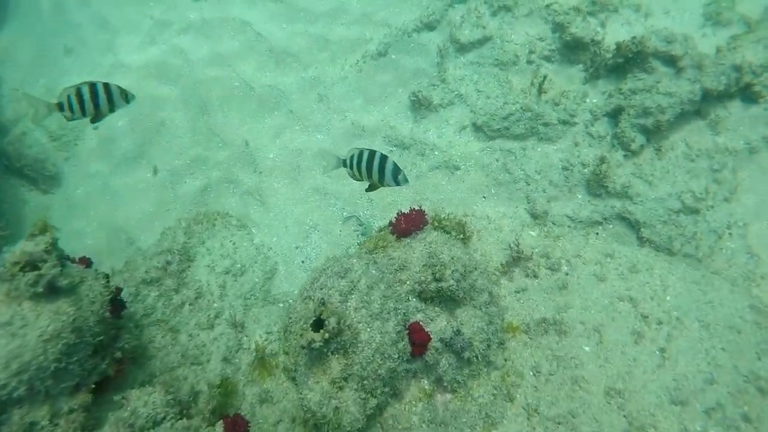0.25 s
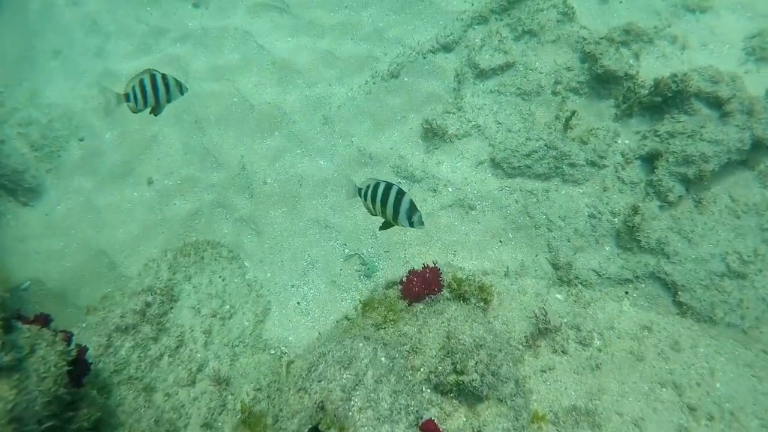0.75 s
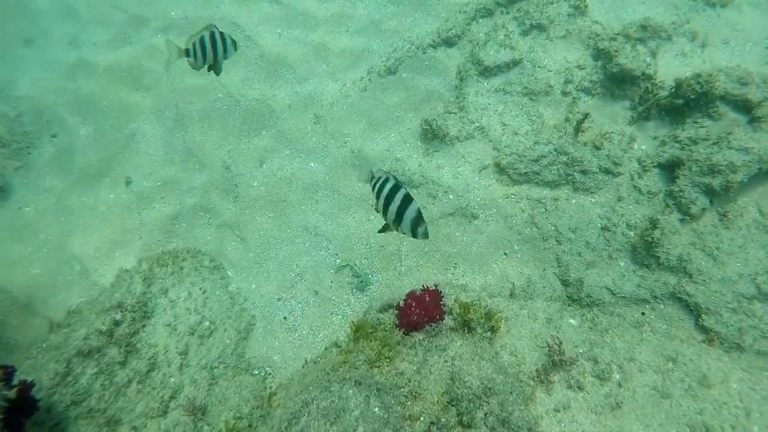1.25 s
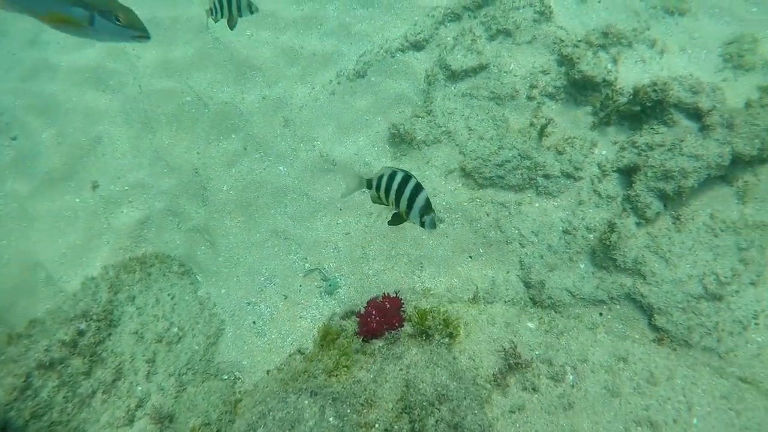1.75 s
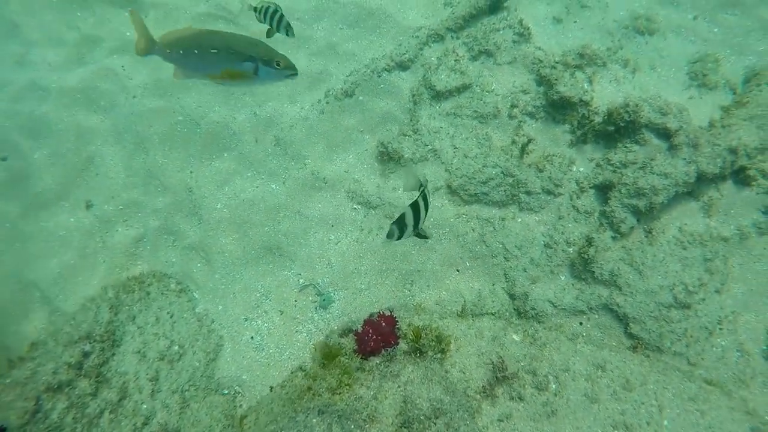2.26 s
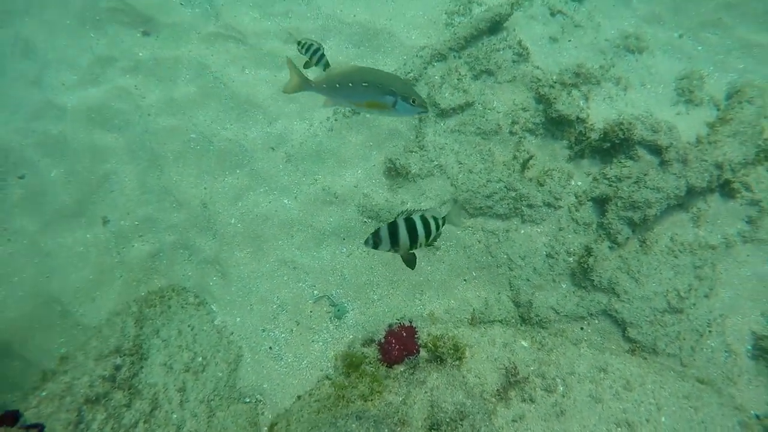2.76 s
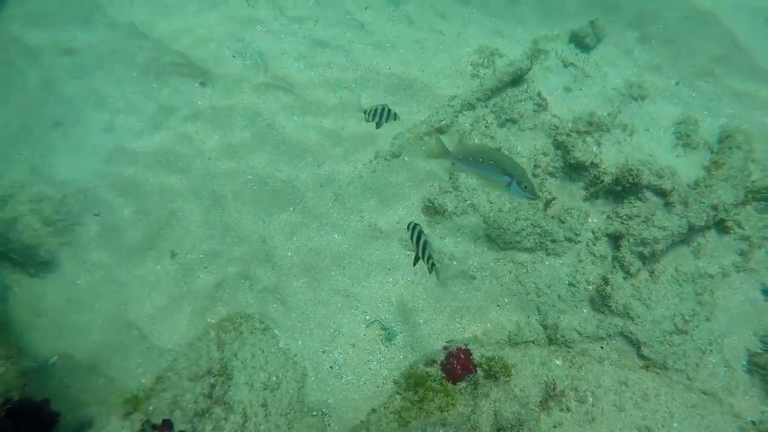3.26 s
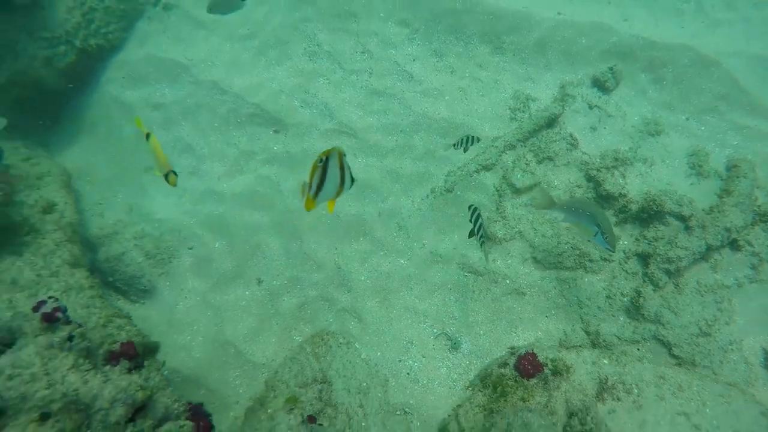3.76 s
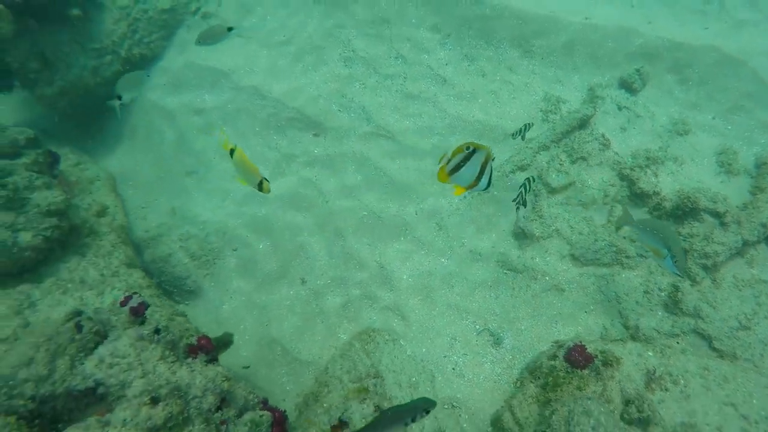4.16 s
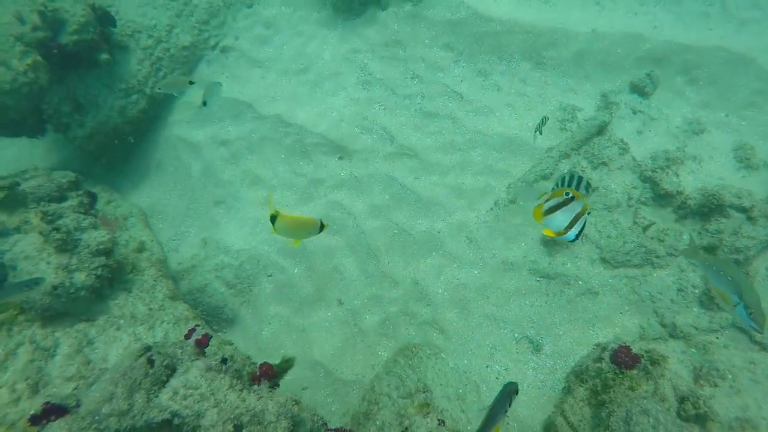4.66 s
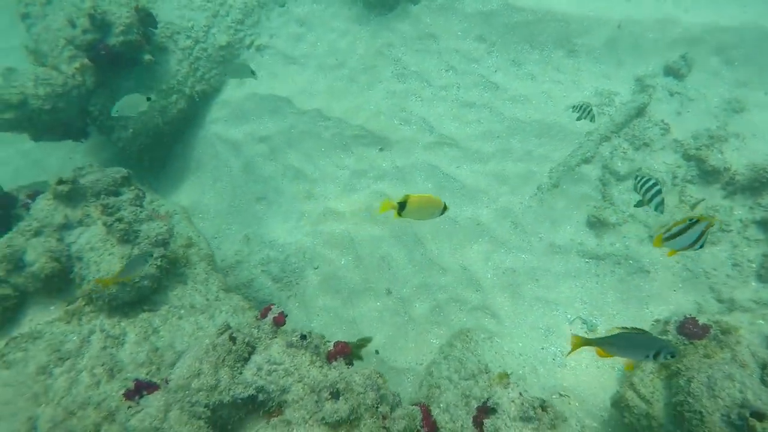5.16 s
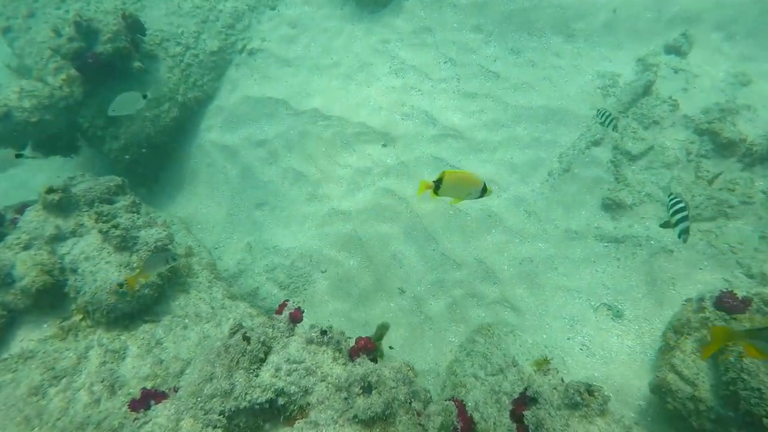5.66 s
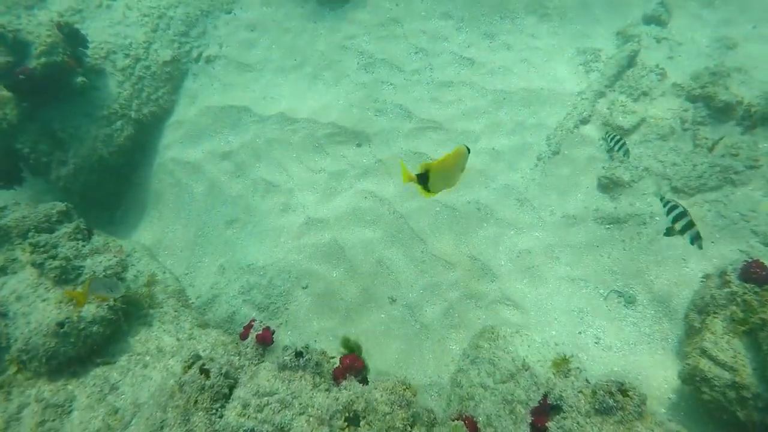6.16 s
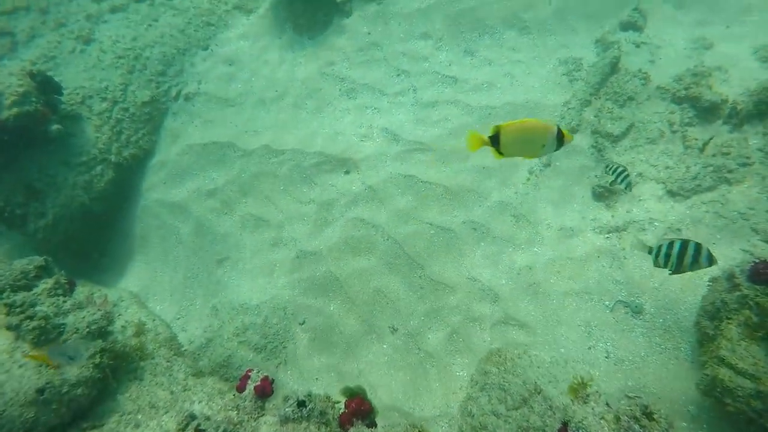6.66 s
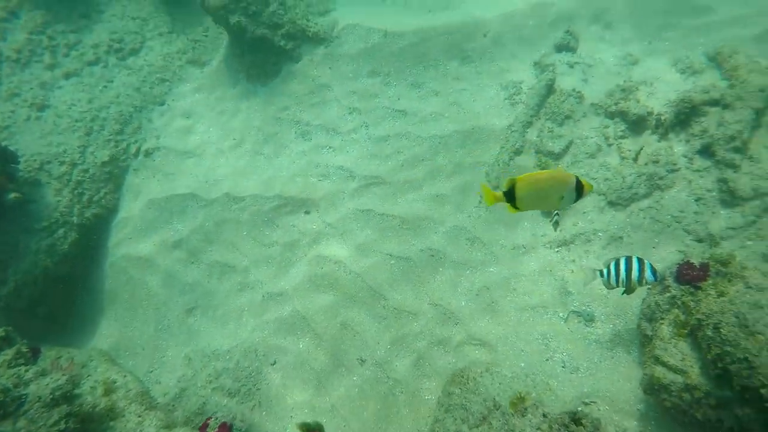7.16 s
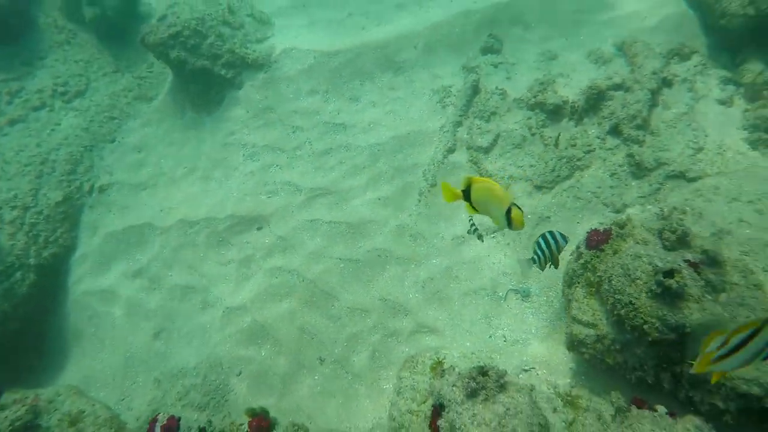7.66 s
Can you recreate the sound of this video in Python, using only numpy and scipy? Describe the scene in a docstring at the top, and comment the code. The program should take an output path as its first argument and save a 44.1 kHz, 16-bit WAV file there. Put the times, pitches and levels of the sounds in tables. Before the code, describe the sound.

A deep underwater rumble swells and eases as water pushes against a submerged camera's housing. Over it runs a constant, irregular crackle of snapping shrimp on the surrounding reef: close cracks and hollow taps, softer clicks further off, and a fine distant sizzle above a low wash. Occasional small bubble blips and soft thumps mix in, and the texture stays much the same throughout.

```python
"""Snapping shrimp crackle all around on a shallow reef, heard from inside a waterproof camera housing.
Each snap is a collapsing bubble: a sharp crack scattered by rock and sand, and a low knock that rings
the housing. Far off, the shrimp merge into a fine sizzle over a low wash. A few bubbles blip, some
snaps carry a deep thump, and water moving past the housing makes a deep, uneven rumble."""
import sys
import numpy as np
from scipy import signal
from scipy.fft import rfft, irfft, next_fast_len
from scipy.io import wavfile
from scipy.ndimage import uniform_filter1d

SR = 44100
rng = np.random.default_rng(int(sys.argv[2]) if len(sys.argv) > 2 else 0)


def store_pcm(level_fs):
    """Save levels as 16-bit WAV."""
    pcm = np.round(np.clip(level_fs, -1, 1) * 32767).astype(np.int16)
    wavfile.write(sys.argv[1], SR, np.atleast_2d(pcm).T)


N = 349272

# push of the water on the housing: t/s, level/dB
WATER_PUSH = [(0.0, -29), (0.12, -28.5), (0.84, -34.7), (1.04, -28.5), (1.32, -36.3), (1.52, -33),
              (2.2, -33.0), (2.56, -28.6), (3.56, -33.5), (4.12, -25), (4.8, -35.5), (4.92, -28.5),
              (6.52, -34), (6.68, -24.5), (7.0, -33.5), (7.16, -26), (7.48, -33.4), (7.91, -30.5)]
# colour of the rumble at the microphone: f/Hz, gain/dB
RUMBLE_COLOUR = [(12, -32.5), (22, -13), (30, 5), (37, -0.5), (45, -0.5), (52, -7.5), (62, -16.5),
                 (76, -29.5), (110, -46.5), (220, -36.5), (500, -104)]
# colour of the wash from the far reef: f/Hz, gain/dB
WASH_COLOUR = [(60, -16.5), (110, 5), (200, -3), (450, -9), (670, -4.5), (850, -11.5), (1200, -27.5),
               (2500, -19.5), (6000, -32), (15000, -38.5)]
# broad response of the housing wall: f/Hz, gain/dB
WALL_RESPONSE = [(90, 6), (180, -4), (450, -13.5), (720, 10), (1250, 0.1), (1700, -8), (2100, 4), (2900, 7),
                 (4100, 1), (5100, -12.5), (5800, -8), (9000, -15.5), (10500, -18), (13000, -16),
                 (15000, -28)]
# resonances of the wall: f/Hz, width/Hz, lift/dB
WALL_RESONANCES = [(1527, 54, 14), (1896, 69, 22), (2367, 220, 11), (3200, 128, 9.5), (3543, 116, 8.5),
                   (6990, 120, 7), (8750, 1160, 7.5)]
# short pitched blips, from bubbles and the thumps under some snaps: t/s, f/Hz, level/dB
BLIPS = [(0.039, 222, -34.5), (0.322, 188, -36), (0.424, 358, -45), (0.597, 263, -41), (.632, 239, -39.5),
         (0.835, 144, -44), (.879, 153, -34.5), (1.124, 900, -49), (1.139, 453, -40.5), (1.328, 175, -30),
         (3.01, 170, -36), (3.085, 620, -38), (3.383, 1960, -47), (7.763, 174, -30)]
# rise and fall of the surrounding colony: t/s, gain/dB
COLONY_SWELL = [(0, 4.5), (.3, -1.5), (.5, -1), (.8, -6.5), (1.1, 1), (1.3, 0.5), (2, 1), (2.35, -4),
                (2.6, 3.5), (3.4, -2), (3.9, -0.5), (4.55, -2), (4.85, -1.5), (5.2, 4.5), (5.55, -4.5),
                (6.15, 0), (6.5, -0.5), (7.92, 1)]
# snaps nearest the microphone: t/s, knock f/Hz, knock level/dB, crack level/dB, bright tick level/dB
NEAR_SNAPS = [(.0397, 500, -36.5, -49, -55), (.1209, 288, -68, -46.5, -63), (.2262, 410, -32.5, -40.5, -50),
              (.2539, 440, -56, -40, -66), (.2651, 450, -46, -45, -67), (.3218, 347, -27.5, -38.5, -57),
              (.3497, 420, -62, -39, -67), (.3805, 566, -38.5, -47, -55), (.5294, 606, -40, -54, -76),
              (.6579, 560, -38, -40, -62), (.6894, 655, -40.5, -38, -59.5), (.7435, 370, -48, -44.5, -56.5),
              (.8579, 350, -73, -47.5, -56), (.8819, 250, -49, -43.5, -58), (1.0571, 684, -33, -40.5, -56),
              (1.0894, 317, -35.5, -42.5, -49.5), (1.1714, 366, -41, -62, -81),
              (1.1845, 208, -52, -43.5, -52), (1.2612, 650, -32.5, -69, -80),
              (1.4322, 540, -67, -43.5, -62), (1.5114, 496, -41, -51.5, -74), (1.5371, 278, -31, -49, -57),
              (1.7766, 360, -31.5, -45, -48.5), (1.8067, 400, -32, -42.5, -45.5),
              (1.909, 333, -41, -48, -57), (1.9281, 645, -32.5, -55, -74), (1.9915, 424, -35.5, -36, -82),
              (2.0745, 550, -34.5, -45, -50), (2.1164, 580, -71, -43, -56), (2.1528, 593, -24.5, -35, -50),
              (2.2653, 250, -70, -48.5, -48), (2.473, 600, -31.5, -49, -73), (2.5409, 434, -34, -42.5, -57),
              (2.6909, 357, -63, -43, -64), (2.7556, 348, -31.5, -45, -54), (2.7965, 605, -31.5, -58, -63),
              (2.8593, 560, -63, -44, -56), (2.8929, 610, -46, -45, -72), (3.001, 330, -37, -35.5, -55),
              (3.2605, 570, -39.5, -49, -54.5), (3.3218, 565, -21, -35.5, -66),
              (3.5227, 450, -60, -45, -54), (3.55, 594, -35.5, -42, -59), (3.6127, 322, -35.5, -41.5, -64),
              (3.7382, 330, -34.5, -59, -52), (3.7762, 620, -32.5, -43, -72),
              (3.8103, 332, -31, -43.5, -42.5), (3.8312, 397, -42, -51, -65), (3.9197, 358, -34, -43, -60),
              (3.9567, 414, -54, -36, -64), (3.9645, 424, -35, -53.5, -69), (3.9901, 427, -40, -46.5, -60),
              (4.0629, 414, -36, -38.5, -49), (4.1, 580, -21, -39, -55), (4.152, 630, -39.5, -50, -61),
              (4.2413, 620, -42.5, -46.5, -63), (4.3067, 500, -50, -44, -63),
              (4.4442, 400, -26.5, -33.5, -48.5), (4.6295, 480, -35, -45.5, -52.5),
              (4.8443, 490, -74, -46, -53.5), (4.9073, 617, -23.5, -37, -56),
              (4.9603, 530, -65, -39.5, -60), (5.0003, 365, -33, -43.5, -55),
              (5.0141, 413, -30.5, -42, -76), (5.0932, 480, -29, -36, -53), (5.1133, 266, -40, -57, -51),
              (5.1279, 530, -32.5, -44, -50), (5.1785, 370, -41, -42.5, -69),
              (5.2135, 293, -34.5, -49.5, -51.5), (5.2329, 550, -35.5, -45.5, -79),
              (5.2514, 613, -29.5, -36.5, -55), (5.2853, 414, -38, -40, -61),
              (5.3142, 540, -35.5, -40, -62), (5.4466, 460, -36, -38, -66),
              (5.4584, 327, -28, -46.5, -41.5), (5.562, 560, -33.5, -43.5, -56.5),
              (5.6619, 590, -22, -36.5, -50), (5.7548, 560, -49, -39, -73), (5.7755, 480, -65, -43.5, -52),
              (6.0661, 585, -33.5, -44.5, -57), (6.0964, 600, -25, -34.5, -57),
              (6.1656, 510, -37, -41, -73), (6.1759, 394, -31.5, -41.5, -55), (6.346, 580, -22, -37.5, -49),
              (6.4028, 550, -69, -42, -59.5), (6.6138, 637, -35, -69, -79), (6.6668, 460, -39, -49, -56),
              (6.6891, 310, -63, -46, -55), (6.7066, 390, -37.5, -42, -52), (6.8369, 315, -40, -50, -78),
              (6.9613, 500, -33.5, -41, -50.5), (7.0517, 280, -31.5, -46.5, -48.5),
              (7.0712, 370, -52, -46, -49.5), (7.1314, 470, -30, -37.5, -53), (7.2214, 744, -35, -43, -53),
              (7.2686, 326, -28.5, -46, -46.5), (7.4167, 460, -39, -50, -53.5),
              (7.5033, 584, -29, -34, -55), (7.5349, 347, -38.5, -46, -60), (7.6382, 288, -35, -40.5, -61),
              (7.6905, 450, -31, -41, -54), (7.7662, 310, -34, -43.5, -77),
              (7.8108, 420, -42, -39.5, -58.5)]

SNAP_SAMPLES, SNAP_S = 2048, .013  # room for one short sound; time over which its level is taken
BODY_HZ, BODY_WIDTH_HZ, BODY_DB = 687.6, 140, 10.5  # main ring of the housing


def undb(db):
    """Decibels to gain."""
    return 10 ** (np.asarray(db) / 20)


def level(x, db):
    """Set the rms level."""
    return x * undb(db) / np.sqrt(np.mean(x ** 2))


def burst_level(x, db):
    """Set each row's energy as an rms level over SNAP_S."""
    return x * undb(db) / np.sqrt(np.sum(x ** 2, axis=-1, keepdims=True) / (SNAP_S * SR))


def colour(x, points):
    """Causal filter through points of f/Hz, gain/dB, built from the cepstrum."""
    size = x.shape[-1]
    hz, db = np.transpose(points)
    f = np.maximum(np.fft.rfftfreq(size, 1 / SR), 1)
    gain = undb(np.interp(np.log(f), np.log(hz), db))
    cepstrum = irfft(np.log(gain), size)
    cepstrum[1:size // 2] *= 2
    cepstrum[size // 2 + 1:] = 0
    return irfft(rfft(x) * np.exp(rfft(cepstrum)), size)


def pass_band(x, kind, hz, order):
    """Keep the "low" or "high" side of hz."""
    return signal.sosfilt(signal.butter(order, hz, kind, fs=SR, output="sos"), x)


def ring(x, hz, width_hz, db):
    """A resonance that lifts its own band by db and rings on."""
    b, a = signal.iirpeak(hz, hz / width_hz, fs=SR)
    return x + (undb(db) - 1) * signal.lfilter(b, a, x)


def noise(points):
    """Steady noise of a given colour."""
    return colour(rng.standard_normal(next_fast_len(N, True)), points)[:N]


def wavelets(hz, swell_s):
    """Short tones that swell and die away, peaking at swell_s."""
    t = np.arange(SNAP_SAMPLES) / SR
    age = t / swell_s
    return (age * np.exp(-age)) ** 2 * np.sin(2 * np.pi * (hz * t + rng.random((len(hz), 1))))


def place(start_s, sounds):
    """Lay each short sound at its time."""
    out = np.zeros(N + SNAP_SAMPLES)
    for start, sound in zip(np.clip(start_s[:, 0] * SR, 0, N - 1).astype(int), sounds):
        out[start:start + SNAP_SAMPLES] += sound
    return out[:N]


def housing(x):
    """On its way to the microphone, sound passes the plastic wall and rings its modes."""
    x = colour(x, WALL_RESPONSE)
    for hz, width_hz, db in WALL_RESONANCES:
        x = ring(x, hz, width_hz, db)
    return x


def far_reef(count=14000, spread_db=5):
    """In the distance, thousands of snaps merge into a sizzle over a soft low wash."""
    clicks = np.zeros(next_fast_len(N, True))
    strengths = rng.choice([-1, 1], count) * undb(spread_db * rng.standard_normal(count))
    clicks[rng.integers(0, N, count)] = strengths
    return level(housing(clicks)[:N], db=-68.5) + level(noise(WASH_COLOUR), db=-52.5)


def water_rumble(gain_db=0.66):
    """Eddies buffet the housing, right at the microphone; their strength follows the water's push."""
    eddies = noise(RUMBLE_COLOUR)
    power = uniform_filter1d(uniform_filter1d(eddies ** 2, size=SR // 4), size=SR // 8)
    push_db = np.interp(np.arange(N) / SR, *np.transpose(WATER_PUSH))
    return eddies / np.sqrt(power) * undb(push_db + gain_db)


def blips():
    """Short pitched blips: a few bubbles, and the deep thumps under some snaps."""
    start_s, hz, db = np.transpose(BLIPS)[:, :, None]
    return place(start_s, burst_level(wavelets(hz, swell_s=0.0062), db))


def knocks(hz, swell_s, db, scatter=0.065, scatter_s=0.0078, short_s=0.0011):
    """The low wave of a snap flexes and rings the housing; little passes above that ring."""
    wave = wavelets(hz, 0.78 * swell_s)
    # short waves break up on the rocks, long ones stay round
    roughness = scatter * np.minimum(short_s / swell_s, 1) ** 2
    t = np.arange(SNAP_SAMPLES) / SR
    paths = roughness * rng.standard_normal(wave.shape) * np.exp(-t / scatter_s)
    paths[:, 0] = 1  # straight to the microphone
    wave = signal.fftconvolve(wave, paths, axes=1)[:, :SNAP_SAMPLES]
    wave = pass_band(wave, "low", hz=820, order=3)
    flexed = ring(wave, hz=215, width_hz=130, db=8)
    return burst_level(ring(flexed, BODY_HZ, BODY_WIDTH_HZ, BODY_DB), db)


def cracks(crack_db, tick_db, bigness, scatter, tail, scatter_s=0.0037, tail_s=0.013,
           ripple_db=4, tilt_db=5, pivot_hz=2700, tick_hz=5000):
    """A sharp pulse, then sparse echoes off nearby rock and a faint tail from the sea bed."""
    t = np.arange(SNAP_SAMPLES) / SR
    diffuse = rng.standard_normal((len(crack_db), SNAP_SAMPLES))
    echoes = diffuse ** 5 / np.sqrt(945)  # sparse spikes of unit power
    pulse = scatter * echoes * np.exp(-t / scatter_s) + tail * diffuse * np.exp(-t / tail_s)
    pulse[:, 0] += 1
    # every path through the rocks has its own broad colour
    f = np.fft.rfftfreq(SNAP_SAMPLES, 1 / SR)
    octaves = np.log2(1 + f / BODY_HZ)
    phases = 2 * np.pi * rng.random((len(crack_db), 2))
    ripple = np.sin(2 * np.pi * octaves + phases[:, :1]) + np.sin(4 * np.pi * octaves + phases[:, 1:])
    # a big bubble cracks lower, a small one higher
    tilt = bigness * np.tanh(2 * np.log2((f + 1) / pivot_hz))
    inside = housing(irfft(rfft(pulse) * undb(ripple_db * ripple - tilt_db * tilt)))
    crack = pass_band(inside, "low", tick_hz, order=4)
    tick = pass_band(inside, "high", tick_hz, order=4)
    return burst_level(crack, crack_db) + burst_level(tick, tick_db)


def snaps(rows, swell_s, scatter, tail, usual_lead_db=3, round_lead_db=9, loud_db=-48.5):
    """Each collapsing bubble gives a knock and a crack; more scatter and tail soften the crack."""
    start_s, hz, knock_db, crack_db, tick_db = np.transpose(rows)[:, :, None]
    # big bubbles crack louder and put more into the knock, which grows from a tap to a round tone
    lead_db = knock_db - crack_db
    bigness = np.tanh((lead_db - usual_lead_db) / 9 + np.maximum(crack_db - loud_db, 0) / 19)
    stretch = 2 ** (1.49 * np.tanh((lead_db - round_lead_db) / 4))
    knock = knocks(hz, swell_s * stretch, knock_db)
    return place(start_s, knock + cracks(crack_db, tick_db, bigness, scatter, tail))


def colony(count, base_db, range_db, knock_lead_db, tick_lead_db, spread_db, low_hz, high_hz):
    """Rows like NEAR_SNAPS for weaker snaps, each with a random time, distance, pitch and brightness."""
    jitter, distance, pitch = rng.random((count, 3)).T
    knock_offset, tick_offset = spread_db * rng.standard_normal((count, 2)).T
    start_s = (np.arange(count) + jitter) / count * N / SR
    hz = low_hz + (high_hz - low_hz) * pitch
    crack_db = base_db - range_db * distance + np.interp(start_s, *np.transpose(COLONY_SWELL))
    knock_db = crack_db + knock_lead_db + knock_offset
    tick_db = crack_db + tick_lead_db + tick_offset
    return np.column_stack([start_s, hz, knock_db, crack_db, tick_db])


def shrimp():
    """Shrimp at three distances: close to the microphone, crisp on the rocks around, soft further off."""
    near = snaps(NEAR_SNAPS, swell_s=0.0011, scatter=0.66, tail=0.14)
    around_rows = colony(count=110, base_db=-45, range_db=7.5, knock_lead_db=5, tick_lead_db=-15,
                         spread_db=3.5, low_hz=273, high_hz=673)
    around = snaps(around_rows, swell_s=0.0017, scatter=0.49, tail=0.11)
    further_rows = colony(count=400, base_db=-54, range_db=8, knock_lead_db=0, tick_lead_db=-14.5,
                          spread_db=5.5, low_hz=164, high_hz=799)
    further = snaps(further_rows, swell_s=0.0054, scatter=0.49, tail=0.28)
    return near + around + further


def scene():
    """One microphone on the reef: shrimp, the far sizzle, short blips and moving water."""
    return (shrimp() + far_reef() + blips() + water_rumble())[None]


def record(dry):
    """The camera cuts the treble steeply above 15.1 kHz."""
    return signal.sosfilt(signal.ellip(8, .2, 80, 15100, fs=SR, output="sos"), dry)


dry = scene()
out = record(dry)
store_pcm(out)
```